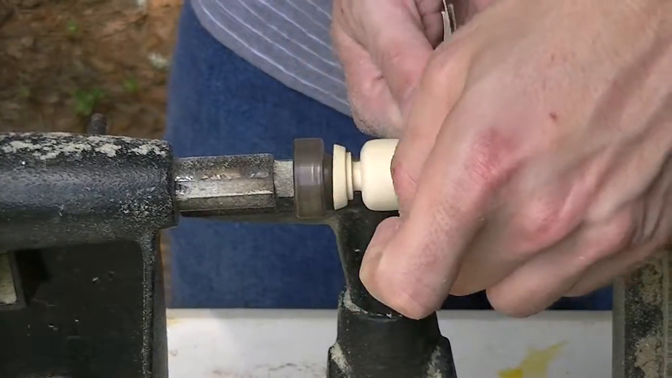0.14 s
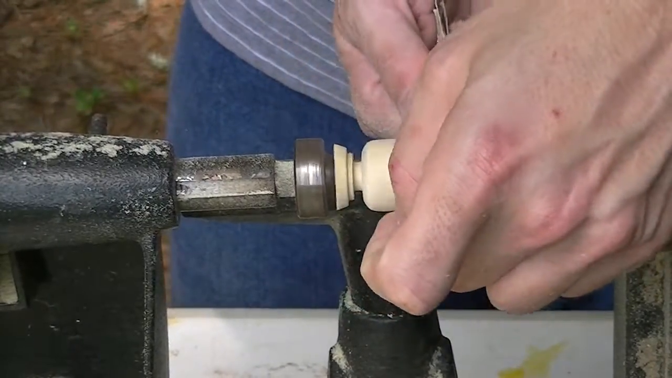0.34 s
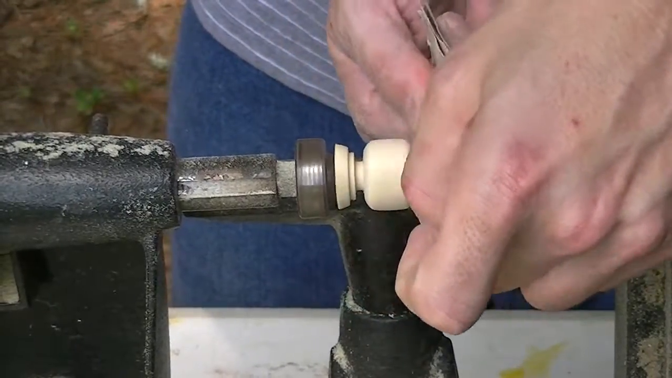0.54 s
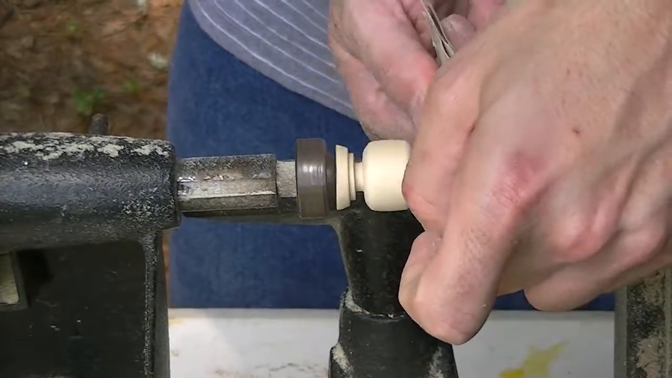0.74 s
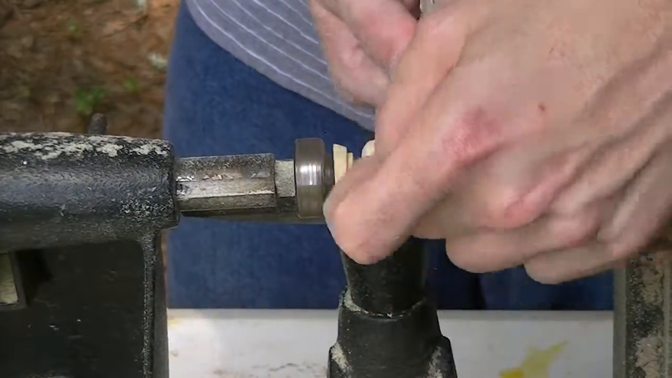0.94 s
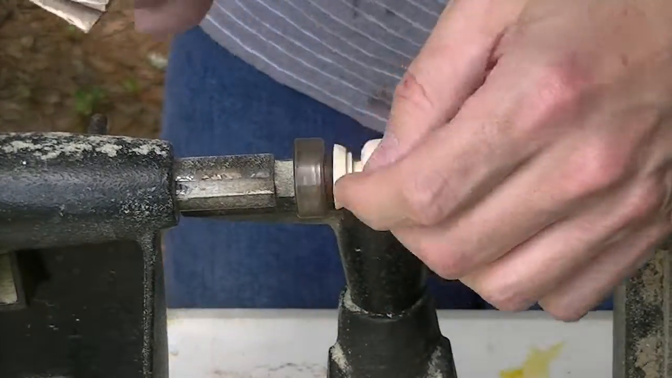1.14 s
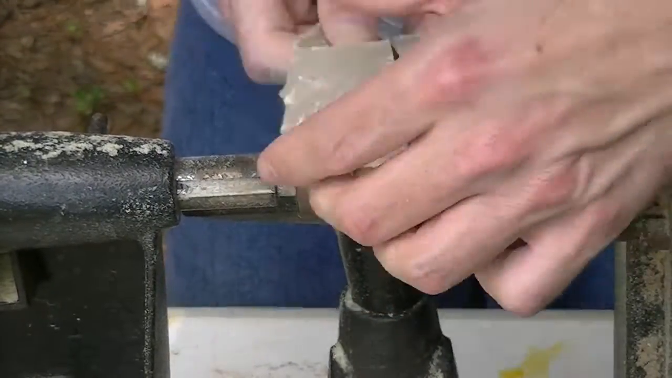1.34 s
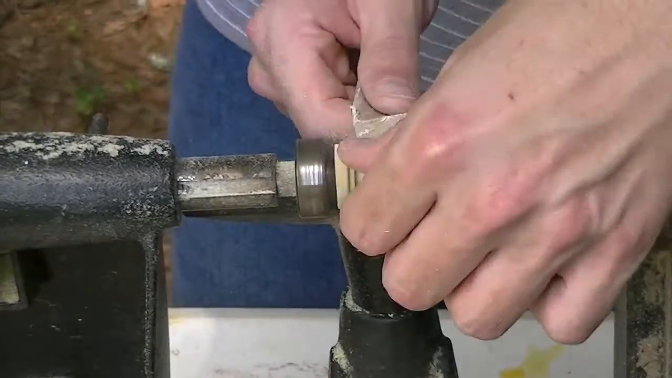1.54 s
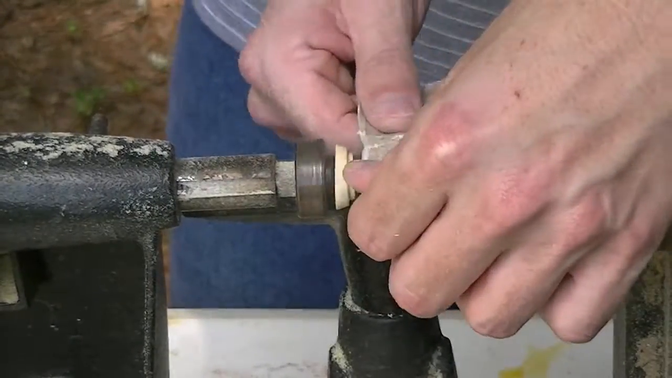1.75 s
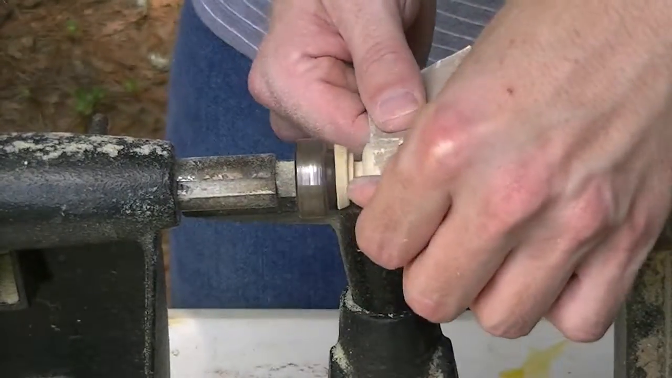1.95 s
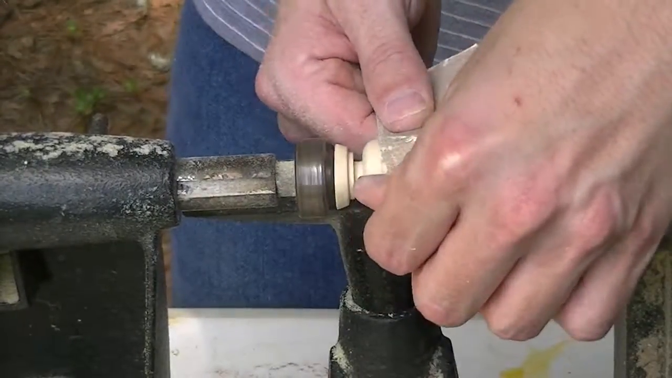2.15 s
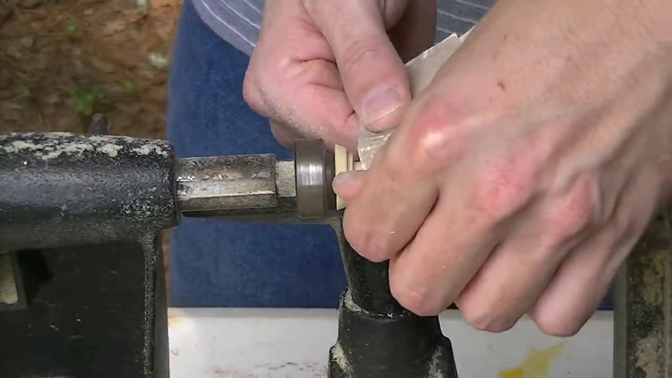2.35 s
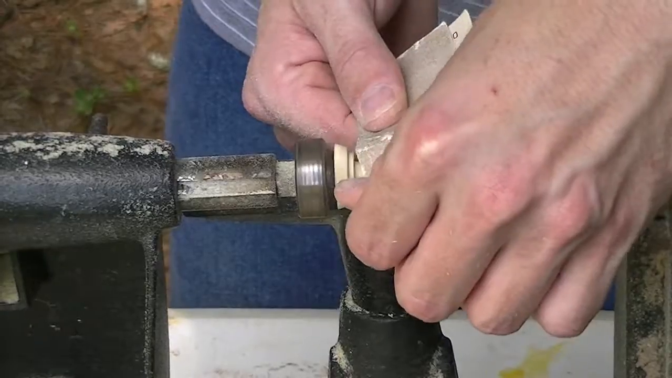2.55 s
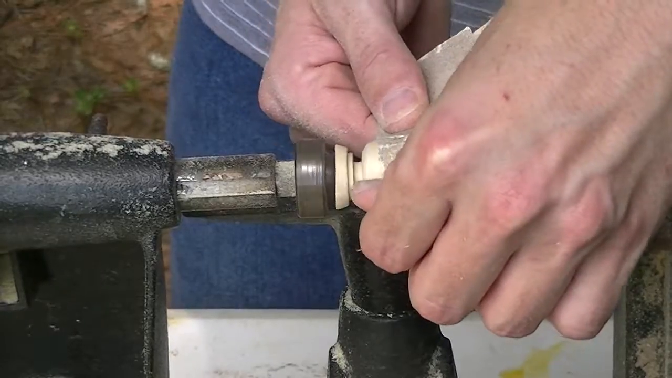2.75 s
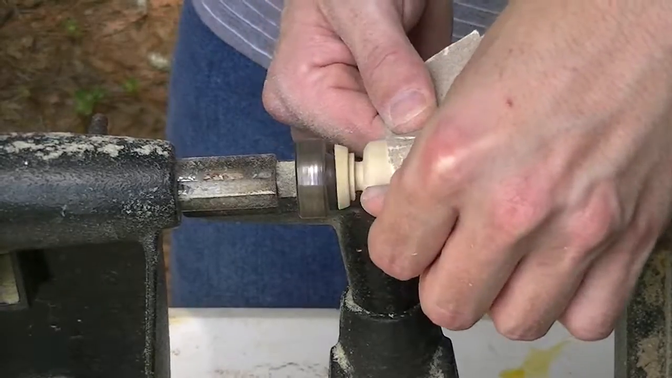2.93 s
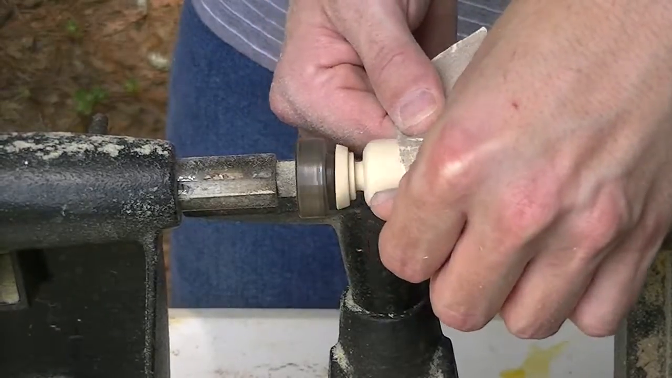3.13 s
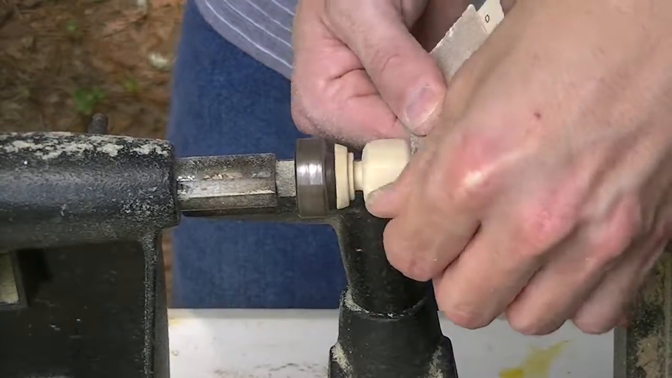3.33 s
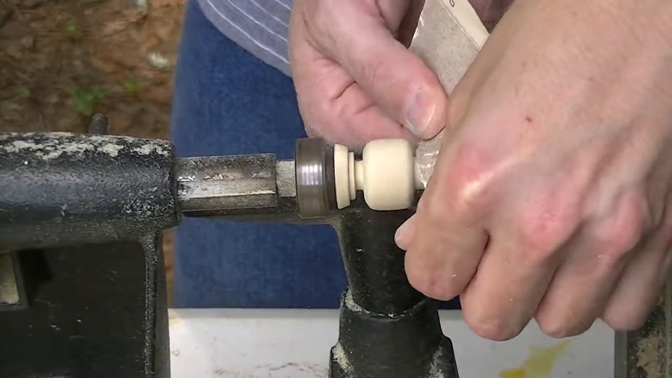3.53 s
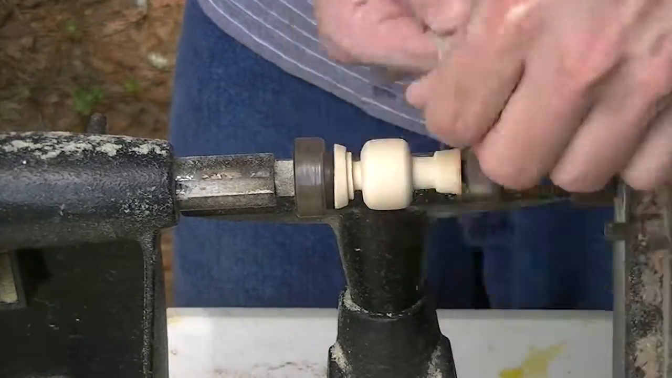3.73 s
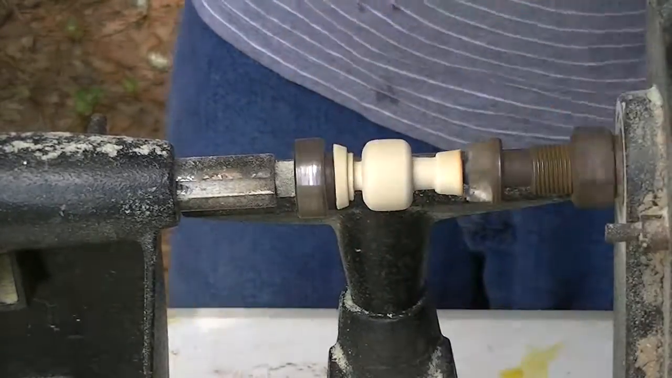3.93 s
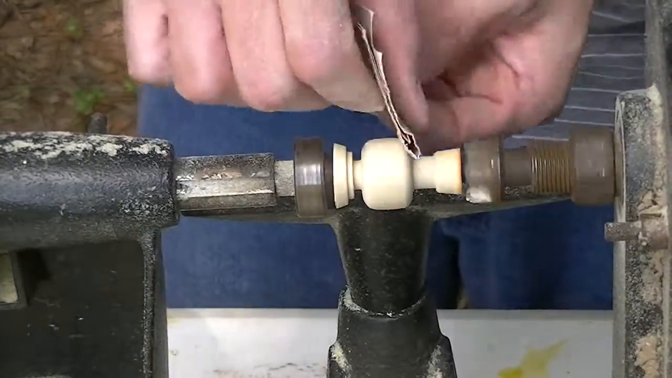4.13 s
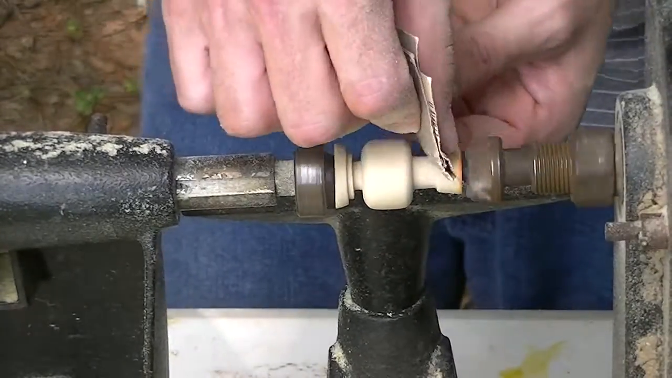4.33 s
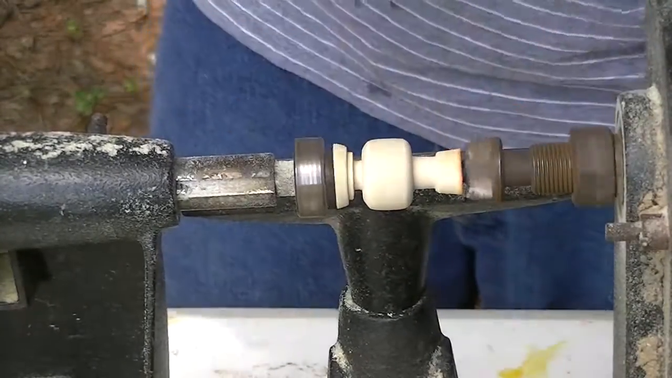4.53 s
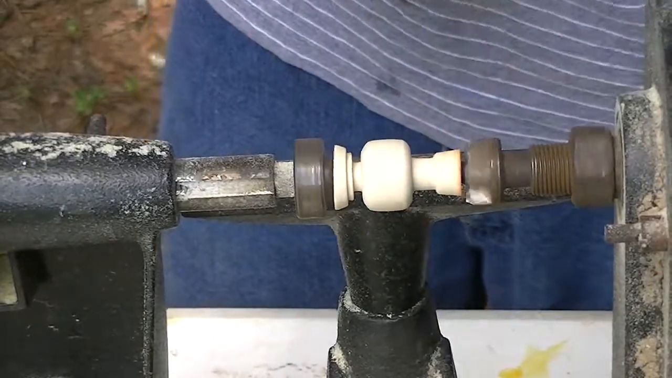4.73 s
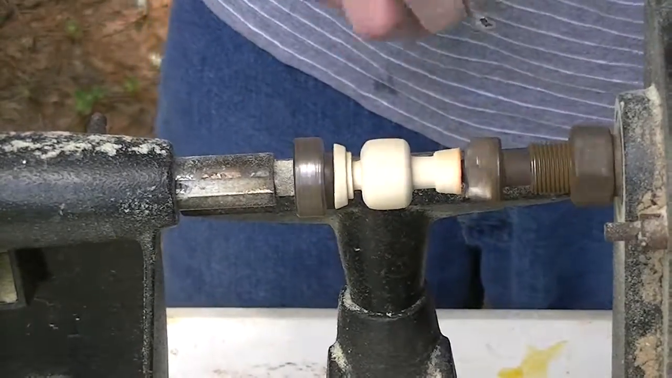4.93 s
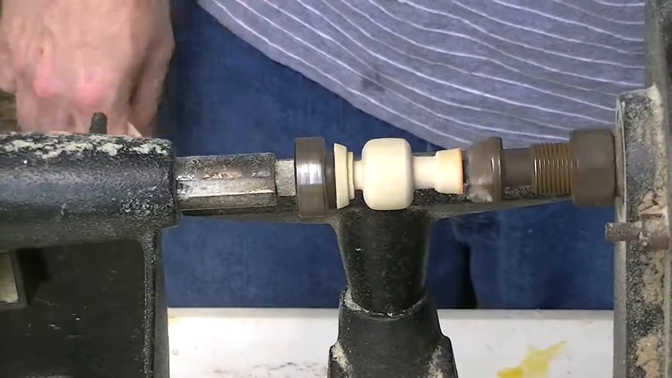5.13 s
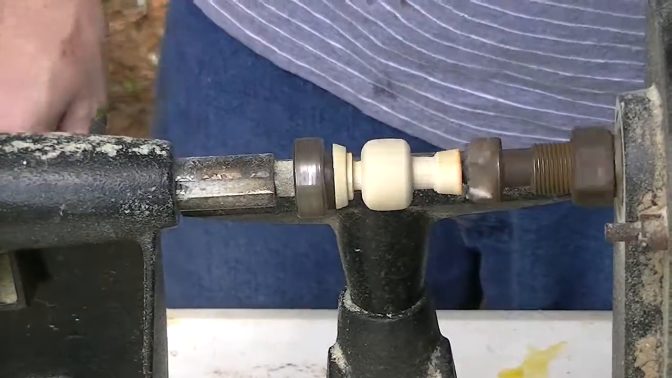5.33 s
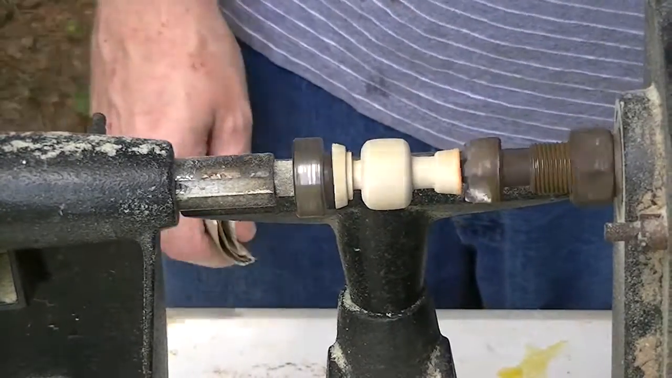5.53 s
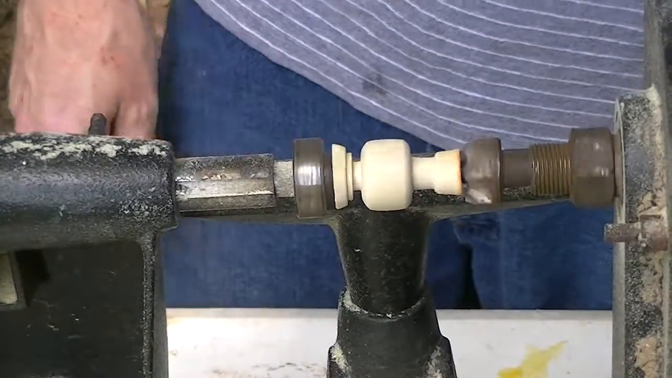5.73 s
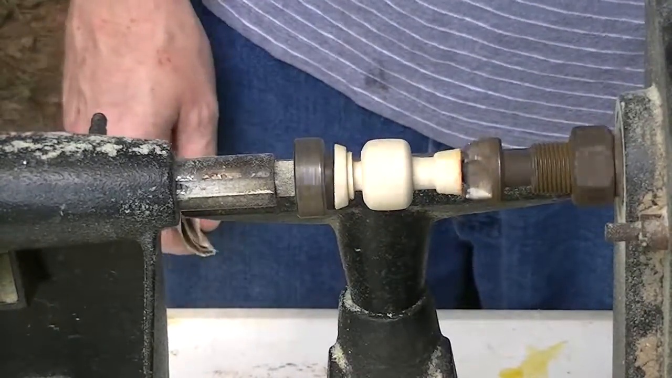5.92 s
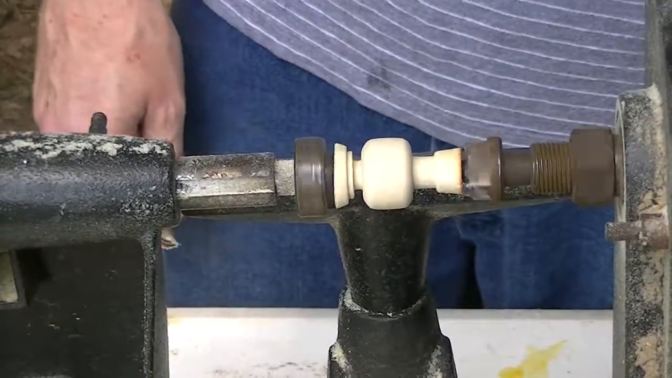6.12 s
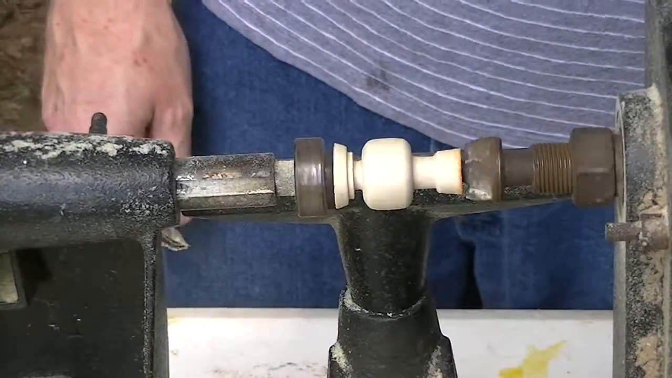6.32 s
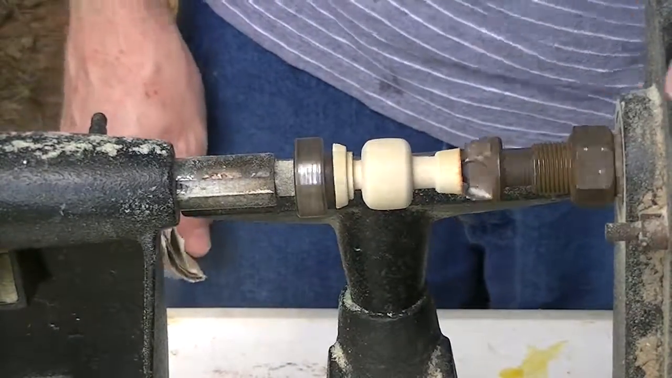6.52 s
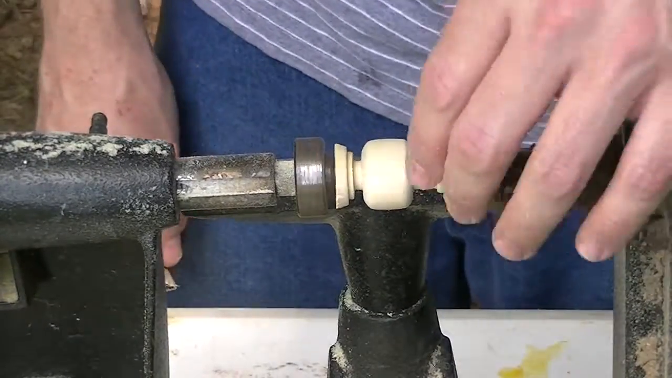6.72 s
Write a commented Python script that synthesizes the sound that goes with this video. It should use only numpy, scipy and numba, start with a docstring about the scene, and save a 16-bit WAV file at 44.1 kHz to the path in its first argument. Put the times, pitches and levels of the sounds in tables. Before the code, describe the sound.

A small lathe whirs steadily while sandpaper hisses on the spinning wood in three spells, then it clicks off and coasts down with slowing bearing ticks.

```python
"""Out of doors, a small wood lathe runs while folded sandpaper is held to the spinning piece in three spells.
The motor is switched off with a click and coasts down; its starting switch snaps back and a bearing ticks
ever slower. Random contacts excite casing and paper resonances, sines give the motor tones, and noise bursts
give the switches and the ticks. One close microphone with a limiter, a bass cut and a top cut."""
import sys
import numpy as np
from scipy import signal
from scipy.io import wavfile
from scipy.ndimage import uniform_filter1d
from numba import njit

SR = 44100
rng = np.random.default_rng(int(sys.argv[2]) if len(sys.argv) > 2 else 0)


def materialize(psi):
    """Save the field psi as 16-bit PCM at rate SR to the path in sys.argv[1].

    A 1-D psi becomes a single channel; in a 2-D psi each row is a channel.
    """
    bounded = np.clip(np.atleast_2d(psi).T, -1, 1)
    quanta = np.round(bounded * 32767).astype(np.int16)
    wavfile.write(sys.argv[1], SR, quanta)


N = 302967
FULL_TURNS_PER_S, POWER_OFF_S = 21.675, 4.8


def from_db(db):
    """Amplitude ratio of a level: twenty decibels to a factor of ten."""
    return 10 ** (np.asarray(db) / 20)


def rms_one(x):
    """Normalisation of the effective value: the signal is scaled to rms 1."""
    return x / np.sqrt(np.mean(x ** 2) + 1e-20)


def in_time(rows):
    """Linear interpolation: the columns after the first (seconds) become one value per sample."""
    seconds, *columns = np.transpose(rows)
    return [np.interp(np.arange(N) / SR, seconds, column) for column in columns]


def filtered(x, order, hz, kind="low"):
    """Butterworth filtering: a passband without ripple."""
    return signal.sosfilt(signal.butter(order, hz, kind, fs=SR, output="sos"), x)


def drift(rate_hz):
    """Low-passed chance: white noise through a double pole at rate_hz, of rms 1."""
    step = 40   # samples between the slow values
    r = np.exp(-2 * np.pi * rate_hz * step / SR)
    white = rng.standard_normal(N // step + 2002)
    slow = signal.lfilter([1], [1, -2 * r, r * r], white)[2000:]   # without the settling
    return np.interp(np.arange(N) / step, np.arange(len(slow)), rms_one(slow))


def grains(per_s, spread_db):
    """Shot noise: two unrelated streams of random contacts of uneven size; rms 1 together."""
    sizes_db = spread_db * np.minimum(rng.exponential(1, (2, N)), 4.4)
    sizes = from_db(sizes_db) * rng.choice([-1, 1], (2, N))
    struck = rng.random((2, N)) < per_s / SR
    return rms_one(sizes * struck)


def coloured(x, spectrum, patchy_db):
    """Band synthesis: third-octaves, taken in turn from two streams, have set levels and flicker separately."""
    edges = 40 * 2 ** (np.arange(28) / 3)
    hz, db = np.transpose(spectrum)
    out = 0
    for k, (low, high) in enumerate(zip(edges, edges[1:])):
        band = filtered(x[k % 2], 2, [low, high], "band")
        level_db = np.interp(np.log(low * high) / 2, np.log(hz), db)
        out = out + band * from_db(level_db + patchy_db * drift(15.0))
    return out


def modes(x, table, patchy_db):
    """Modal superposition: parallel resonances of alternating sign, each swelling on its own."""
    out = 0
    for k, (hz, width_hz, db) in enumerate(table):
        r, w = np.exp(-np.pi * width_hz / SR), 2 * np.pi * hz / SR
        numerator, denominator = [(1 - r * r) / 2, 0, (r * r - 1) / 2], [1, -2 * r * np.cos(w), r * r]
        rung = signal.lfilter(numerator, denominator, x + 1e-18)
        out = out + (-1) ** k * from_db(db + patchy_db * drift(5.9)) * rung
    return out


@njit
def moving_resonance(x, cosine, r):
    """Damped oscillator: a two-pole resonance whose centre moves."""
    y = np.zeros(len(x))
    for i in range(2, len(x)):
        y[i] = (1 - r * r) / 2 * (x[i] - x[i - 2]) + 2 * r * cosine[i] * y[i - 1] - r * r * y[i - 2]
    return y


def paper_ring(x, hz, width_hz):
    """Resonance of a stretched sheet: the paper favours a band, filtered twice for steep flanks; rms 1."""
    r, cosine = np.exp(-np.pi * width_hz / SR), np.cos(2 * np.pi * hz / SR)
    return rms_one(moving_resonance(moving_resonance(x, cosine, r), cosine, r))


def spindle():
    """Frictional slowing: turns per second, and turns counted from switch-off."""
    slowing, easing = 10.35, .3125   # turns/s^2 of friction, turns/s^3 by which it eases
    off = np.arange(N) / SR - POWER_OFF_S
    coast = np.maximum(off, 0)
    turns_per_s = FULL_TURNS_PER_S - slowing * coast + easing * coast ** 2 / 2
    turns = FULL_TURNS_PER_S * off - slowing * coast ** 2 / 2 + easing * coast ** 3 / 6
    return turns_per_s, turns


def throb(depth_db):
    """Unbalance force: a swell once a turn, uneven from turn to turn, fading below 12 turns per second."""
    turns_per_s, turns = spindle()
    angle = 2 * np.pi * turns + 1.5 * drift(3.3)
    depth_db = depth_db * np.clip(turns_per_s / 12, 0, 1)
    return from_db(depth_db * (0.5 + np.tanh(drift(5.7))) * np.sin(angle))


def grip():
    """Changed boundary condition: each new grip on the paper retunes it and holds until the next."""
    # Each row: start in seconds, lower paper resonance in dB re the hiss, upper resonance in dB rms,
    # upper resonance in Hz, rise of the lathe's treble in dB.
    holds = [(0, -6, -43, 13200, -5), (1.0, -15, -38, 13200, 0), (1.52, -10, -38, 13700, -10),
             (1.65, -5, -33, 14200, -8), (1.87, -3.5, -43, 13900, -1.5), (2.04, -3.5, -33, 14100, -1),
             (2.4, -1.5, -38, 14200, -0.8), (3.095, -7.5, -23, 14300, -1), (3.222, -2, -37, 13000, 2),
             (3.3, -3.5, -43, 13900, 2), (3.63, -10, -35, 14500, 0), (3.715, -5, -29, 14200, 1),
             (3.88, -10, -38, 13450, -0.5), (4.29, -3.5, -55, 13500, 0.5)]
    regrip_s = .03
    since, *held = np.transpose(holds)
    now = np.clip(np.searchsorted(since, np.arange(N) / SR, side="right") - 1, 0, None)
    return [uniform_filter1d(column[now], size=int(regrip_s * SR)) for column in held]


def air():
    """Broadband ambient noise: distant outdoor hiss with a low hump and a broad top."""
    # Each row: centre in Hz, width in Hz, gain in dB.
    hiss_bands = [(930, 910, -32.5), (6000, 24000, -47)]
    return modes(rng.standard_normal(N), hiss_bands, patchy_db=1.5)


def switches():
    """Impact transient: a quick rise to a sharp crack, then a short rattle of springs and steel."""
    # Switches and knocks on the tool rest. Each row: time in seconds, crack level in dB,
    # gain of the treble in dB (knocks are duller than snaps).
    snaps = [(.18, -16, -6), (3.614, -15, -10), (3.788, -18, -16), (3.838, -15, -12), (4.619, -17, -10),
             (4.768, -13, -6), (5.658, -6.5, 2)]
    # Spectrum of the noise. Each row: frequency in Hz, relative level in dB per Hz.
    snap_spectrum = [(300, -45), (700, 7), (1500, 10), (2600, 12.5), (4500, 5.5), (10000, 8.5),
                     (16000, 1.5)]
    rise_s, crack_t60_s, rattle_t60_s, rattle_db = .001, .012, .065, -2   # rattle re crack
    t, out = np.arange(N) / SR, 0
    noise = rms_one(coloured(rng.standard_normal((2, N)), snap_spectrum, patchy_db=0))
    # Without phase shift, so that the remainder is the treble.
    dull = signal.sosfiltfilt(signal.butter(2, 7500, fs=SR, output="sos"), noise)
    treble = noise - dull
    for s, db, treble_db in snaps:
        rise = np.exp(np.minimum(t - s, 0) / rise_s)
        age = np.maximum(t - s, 0)
        crack = from_db(db - 60 * age / crack_t60_s)
        rattle = from_db(db + rattle_db - 60 * age / rattle_t60_s)
        out = out + rise * (crack + rattle) * (dull + from_db(treble_db) * treble)
    return filtered(out, 4, 700, "high")


def bearing():
    """Periodic impacts: coasting, balls tick over a flaw a fixed number of times a turn and ring the bearing."""
    # Ticks given their own time and force. Each row: time in seconds, blow in dB.
    set_ticks = [(4.8609, -1), (4.9151, 1), (5.0669, -7), (5.1686, -3), (5.233, -3), (5.2922, -6.5),
                 (5.3461, -7), (5.4089, -7), (5.4944, -3), (5.7777, -8), (5.834, -12), (5.88, -7),
                 (5.9282, -5.5), (6.044, -10), (6.0737, -8), (6.102, -12), (6.1477, -13), (6.2145, -7),
                 (6.2472, -11), (6.2672, -9.5), (6.3249, -15), (6.3455, -14), (6.4601, -15), (6.4877, -14),
                 (6.5725, -16), (6.6069, -17), (6.6855, -17), (6.7231, -18), (6.787, -16)]
    # Modes of the bearing. Each row: centre in Hz, width in Hz, gain in dB.
    bearing_modes = [(6600, 270, -14.5), (8920, 310, -8.5), (9730, 79, -2), (10180, 88, -1),
                     (11200, 350, -9.5), (13200, 870, -13), (15600, 690, -16)]
    ticks_per_turn, lead = 8, .46   # lead: share of a gap already gone at switch-off
    full_speed_db, speed_power, spread_db = -8.5, 0.69, 3
    heavy_side_db, heavy_turn = 1, .38   # where in the turn the heavy side passes
    jitter = .06   # share of a gap
    turns_per_s, turns = spindle()
    passed = np.diff(np.floor(ticks_per_turn * turns + lead), prepend=0) > 0
    at = np.flatnonzero(passed & (turns > 0))
    chance = rng.standard_normal((len(at), 2))
    speed_db = speed_power * 20 * np.log10(turns_per_s[at] / FULL_TURNS_PER_S)
    heavy_db = heavy_side_db * np.cos(2 * np.pi * (turns[at] - heavy_turn))
    db = full_speed_db + speed_db + spread_db * chance[:, 0] + heavy_db
    at = at + jitter * chance[:, 1] * np.gradient(at)
    for s, blow_db in set_ticks:
        nearest = np.argmin(abs(at - s * SR))
        at[nearest], db[nearest] = s * SR, blow_db
    knocks = np.zeros(N)
    knocks[np.minimum(at.astype(int), N - 1)] = from_db(db)
    scuff = signal.lfilter([1], [1, -np.exp(-1 / (0.002 * SR))], knocks)   # decays over 2 ms
    return modes(scuff * rng.standard_normal(N), bearing_modes, patchy_db=-1.0)


def sanding():
    """Friction noise and stick-slip: grit tears fibres in dense clumps, exciting two bands of the paper."""
    # Pressure in three spells, heard as hiss. Each row of a spell: time in seconds, hiss in dB.
    spells = [
        [(0, -28), (.17, -27), (.42, -28.5), (.85, -24), (.99, -25)],
        [(1.52, -26.5), (1.63, -25.5), (1.66, -24), (2.2, -26), (2.35, -29.5), (2.65, -28), (2.8, -31.5),
         (3.1, -26), (3.21, -26), (3.225, -19.5), (3.29, -30), (3.36, -49), (3.47, -26), (3.74, -26)],
        [(4.2, -26), (4.26, -26), (4.29, -30), (4.34, -24), (4.4, -28)],
    ]
    # Spectrum of the grit. Each row: frequency in Hz, relative level in dB per Hz.
    grit_spectrum = [(2500, -25), (5000, 7), (8000, 4), (11000, 6.5), (14000, -4.5), (16000, 3)]
    # The paper grabs and slips. Each row: time in seconds, size in dB re a common level.
    slip_times = [(3.0939, -15), (3.1158, -9), (3.2206, -1), (3.239, -6.5), (3.2494, -5), (3.2594, -12),
                  (3.2694, -3), (3.286, -10), (3.5955, -18), (3.6342, -2.5), (3.6534, -17), (3.6584, -16),
                  (3.679, -5.5), (3.7044, -10), (3.7374, -7)]
    lower_hz, slip_t60_s, slip_reference_db, slip_broad_db = 8290, .025, -10.5, -8
    t = np.arange(N) / SR
    hiss_db, = in_time(sum(spells, []))
    lower_db, upper_db, upper_hz, _ = grip()
    touching = 0
    for spell in spells:
        start, end = spell[0][0], spell[-1][0]
        touching = touching + np.interp(t, [start - .01, start, end, end + 0.011], [0, 1, 1, 0])
    tearing = grains(14000, 4.2) * from_db(1.36 * drift(34.0)) * throb(0.83)
    broad = rms_one(coloured(tearing, grit_spectrum, patchy_db=-1.0))
    lower = paper_ring(tearing[0], np.full(N, lower_hz), width_hz=1350)
    upper = paper_ring(tearing[1], upper_hz + 120 * drift(9.0), width_hz=1300)
    uneven = from_db(0.8 * drift(14.0))   # the fingers never press evenly
    hiss = from_db(hiss_db) * (broad + from_db(lower_db) * lower)
    steady = touching * (hiss + from_db(upper_db) * uneven * upper)
    # Slips start hard and die at once.
    slips = sum((t > s) * from_db(db + slip_reference_db - 60 * abs(t - s) / slip_t60_s)
                for s, db in slip_times)
    return steady + slips * (lower + 0.45 * upper + from_db(slip_broad_db) * broad)


def casing_noise(t):
    """Forced vibration: rolling contacts shake bed and casing; narrow modes weaken after switch-off."""
    # Spectrum of the roar. Each row: frequency in Hz, relative level in dB per Hz.
    roar_spectrum = [(100, -33), (210, -33), (310, 0), (440, -12), (640, -0.5), (1150, -10.5), (1800, -1.5),
                     (2200, -7.5), (3000, -5), (4100, -12.5), (5700, -11.5), (7600, -9.5), (9500, -10),
                     (12500, -14.5), (16000, -18)]
    # Modes of bed and casing. Each row: centre in Hz, width in Hz, relative gain in dB.
    casing_modes = [(325, 46, -1), (727, 61, -6), (1012, 23, 2.5), (1032, 27, 9.5), (1247, 160, 0),
                    (1532, 8.2, 6), (1870, 66, 6.5), (2710, 230, -1), (3580, 72, 5.5), (4570, 95, -2),
                    (5190, 73, -1), (5600, 28, -7)]
    # Narrow modes shaken by the motor. Each row: centre in Hz, width in Hz, relative gain in dB.
    driven_modes = [(615, 45, -10), (694, 35, -8), (925, 50, -7), (1045, 30, -7), (1271, 40, -7.5),
                    (1850, 70, -3), (2002, 30, -2.5), (2509, 26, 0.5), (2776, 22, -3.5), (3035, 55, 2.5),
                    (3273, 20, 1.5), (3580, 90, -5), (3838, 17, -5), (4327, 37, -6), (4452, 34, -9),
                    (5050, 27, -3.5), (5557, 50, -3), (5840, 42, -8), (6060, 52, -7.5), (6590, 50, -7),
                    (6800, 50, -7), (7105, 40, -8.5)]
    roar = rms_one(coloured(grains(15000, 2.4), roar_spectrum, patchy_db=1.5))
    rolling, shaking = grains(9000, 3.34)
    casing = rms_one(modes(rolling, casing_modes, patchy_db=1.0))
    driven = rms_one(modes(shaking, driven_modes, patchy_db=1.3))
    shake = np.exp(-np.maximum(t - POWER_OFF_S, 0) / 2.15)   # the narrow modes linger
    mix = (0.75 + 0.2 * shake) * roar
    mix = mix + from_db(1.0) * (1 - 0.64 * shake) * casing
    return mix + from_db(-2.0) * shake * driven


def motor_tones(t, power):
    """Tonal excitation: hum and whine under power, brief swells and lingering casing tones while coasting."""
    # Hum and whine of the powered motor. Each row: frequency in Hz, level in dB rms.
    hum_tones = [(145, -64), (240, -46.5), (480, -46.5), (1017, -43), (2620, -51), (3100, -42.5),
                 (3340, -52), (3688, -49)]
    # Casing tones that swell as the speed falls. Each row: time in seconds, frequency in Hz, dB rms at the crest.
    swells = [(4.81, 2560, -29), (4.96, 2556, -29.5), (5.08, 1910, -33), (5.32, 1890, -36),
              (5.46, 1018, -35), (5.79, 3600, -38), (6.35, 736, -42)]
    # Two close casing tones that outlast the roar. Each row: frequency in Hz, level in dB rms.
    linger_tones = [(1001, -53), (1023, -56)]
    swell_s = .03
    waver = 0.97 * drift(16.0)   # radians

    def tone(hz, db, phase=0):
        """Simple harmonic motion: a sine of given rms level."""
        return np.sqrt(2) * from_db(db) * np.sin(2 * np.pi * hz * t + phase)

    ring = sum(np.exp(-((t - s) / swell_s) ** 2 / 2) * tone(hz, db, waver) for s, hz, db in swells)
    hum = sum(tone(hz, db + drift(0.4)) for hz, db in hum_tones)
    linger = sum(tone(hz, db + 2 * drift(6.0), waver) for hz, db in linger_tones)
    return power * hum + ring + (1 - power) * linger


def lathe():
    """Amplitude modulation: speed, pulley beat and unbalance shape the casing noise; coasting, the bed rocks."""
    # Level of the body before the fall with speed. Each row: time in seconds, level in dB.
    body_levels = [(0, -25), (1.0, -25.5), (1.8, -26.5), (2.8, -26), (3.19, -26.5), (3.24, -22.5),
                   (3.29, -26), (3.33, -24), (3.45, -25.5), (3.8, -26.5), (4.0, -26.5), (4.75, -27.5),
                   (4.79, -28.5), (4.83, -26.5), (5.1, -25.5), (5.55, -23), (5.64, -22.5), (5.84, -22.5),
                   (6.1, -23.5), (6.33, -23), (6.6, -23.5)]
    # Low rumble, which sinks and returns in coasting. Each row: time in seconds, level in dB re body.
    rumble_levels = [(0, 1.5), (3.18, 3.5), (3.26, -6), (3.35, 2), (4.8, 5), (4.93, -7.5), (5.12, -6.5),
                     (5.19, -1.5), (5.25, 4.5), (5.3, 1), (5.34, 7), (5.39, -4), (5.44, 8), (5.475, -4),
                     (5.53, 7.5), (5.58, -12), (5.77, -4), (5.82, -2.5), (5.9, -12), (6.0, -6), (6.07, 5.5),
                     (6.14, -3), (6.18, 2), (6.26, -8), (6.34, -4), (6.45, -2), (6.87, 5)]
    field_fade_s, pulley_hz = 0.11, 36
    body_power, idle_db = 1.454, -53   # body level goes as speed to this power, above a steady floor
    hiss_db, hiss_power = 1.35, 0.98   # treble re body; it dulls further as the speed drops
    t = np.arange(N) / SR
    speed = spindle()[0] / FULL_TURNS_PER_S
    body = np.hypot(from_db(in_time(body_levels)[0]) * speed ** body_power, from_db(idle_db))
    rumble_db, = in_time(rumble_levels)
    power = np.exp(-np.maximum(t - POWER_OFF_S, 0) / field_fade_s)
    mix = casing_noise(t)
    low = filtered(mix, 4, 700)
    middle = filtered(mix, 4, [700, 4200], "band")
    high = filtered(mix, 4, 4200, "high")
    # The pulley is out of round and beats while the motor is powered.
    beat = from_db(1.62 * power * np.sin(2 * np.pi * pulley_hz * t + 0.67 * drift(0.89)))
    rocking = throb(1.1) ** (1 - power)
    treble_db = hiss_db + grip()[3] + 1.08 * drift(28.0)
    shaped = from_db(rumble_db) * beat * rocking * low
    shaped = shaped + beat ** 0.43 * rocking * middle
    shaped = shaped + from_db(treble_db) * speed ** hiss_power * beat ** 0.39 * high
    return body * throb(1.05) * shaped + motor_tones(t, power)


def scene():
    """Superposition: the pressures of all sources add at one microphone, given to both channels."""
    return np.tile(air() + switches() + bearing() + sanding() + lathe(), (2, 1))


def record(dry):
    """Gain control and band limiting: a look-ahead limiter, a bass cut, a treble dip and a top cut."""
    limit_db, release_db_s, attack_s = -16, 75, .001
    dip_hz, dip_width_hz, dip_depth = 7600, 500, .4
    # The mean square is taken over 4 ms, mostly ahead.
    level_db = 10 * np.log10(uniform_filter1d(dry[0] ** 2, size=176, origin=-40) + 1e-12)
    ramp = release_db_s * np.arange(N) / SR   # recovery at a steady rate
    over_db = np.maximum.accumulate(np.maximum(level_db - limit_db, 0) + ramp) - ramp
    r = np.exp(-1 / (attack_s * SR))
    x = dry * from_db(-signal.lfilter([1 - r], [1, -r], over_db))
    x = filtered(x, 3, 150, "high")
    # The microphone housing cancels part of a narrow band.
    x = x - dip_depth * signal.lfilter(*signal.iirpeak(dip_hz, dip_hz / dip_width_hz, fs=SR), x)
    return signal.sosfilt(signal.ellip(14, .5, 75, 15740, fs=SR, output="sos"), x)


dry = scene()
out = record(dry)
materialize(out)
```